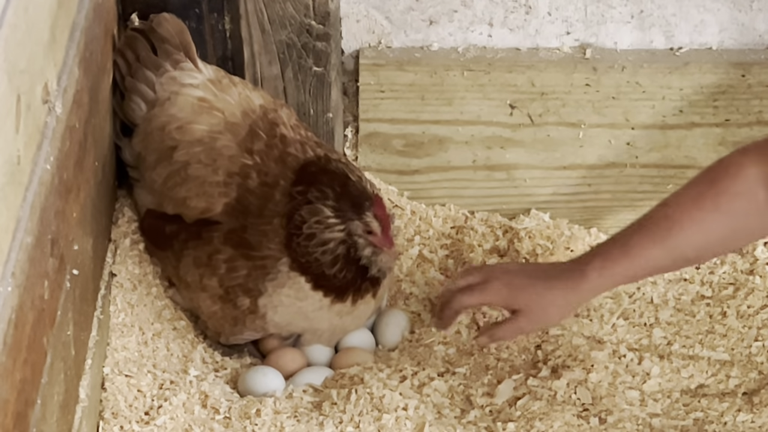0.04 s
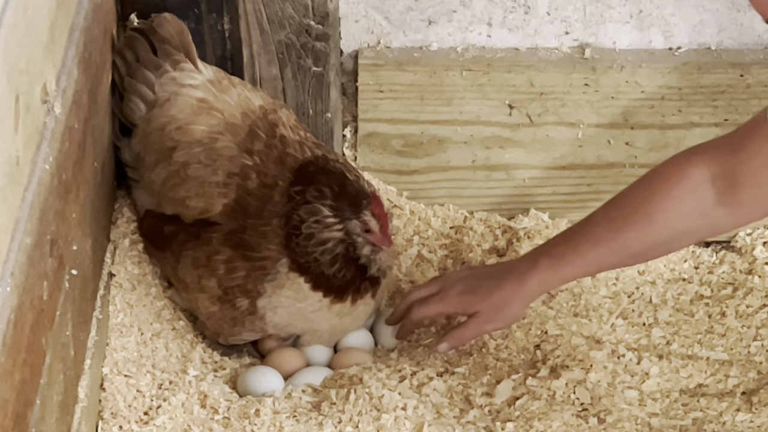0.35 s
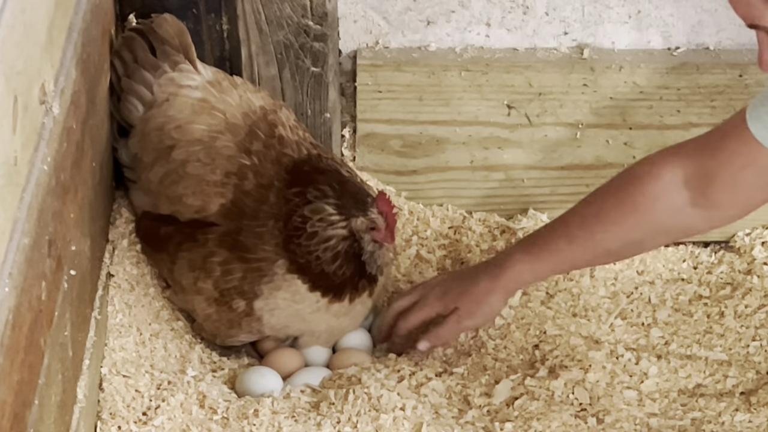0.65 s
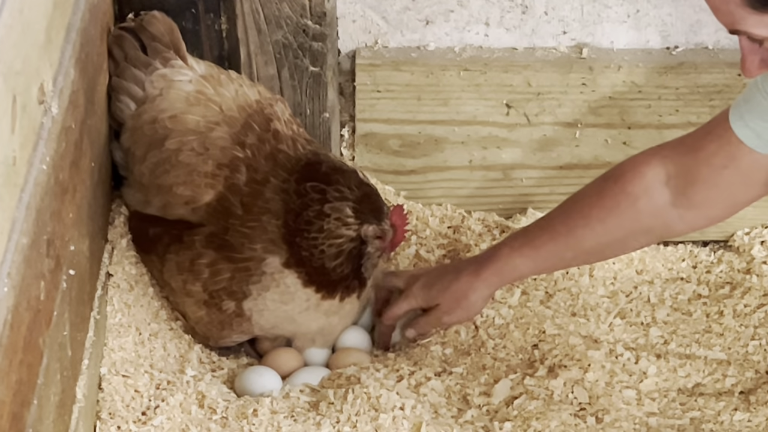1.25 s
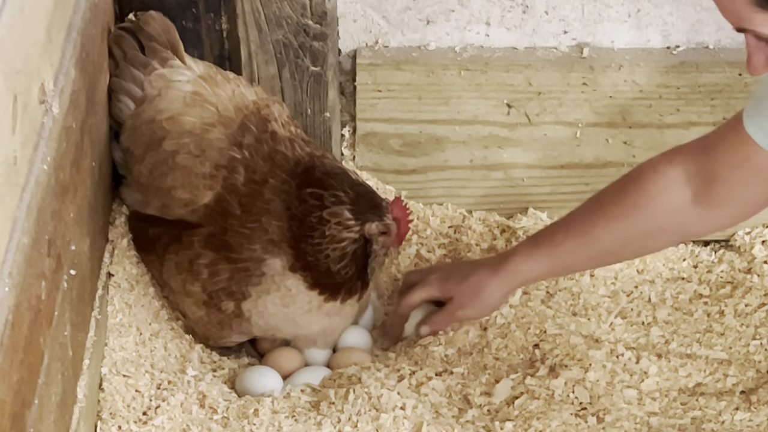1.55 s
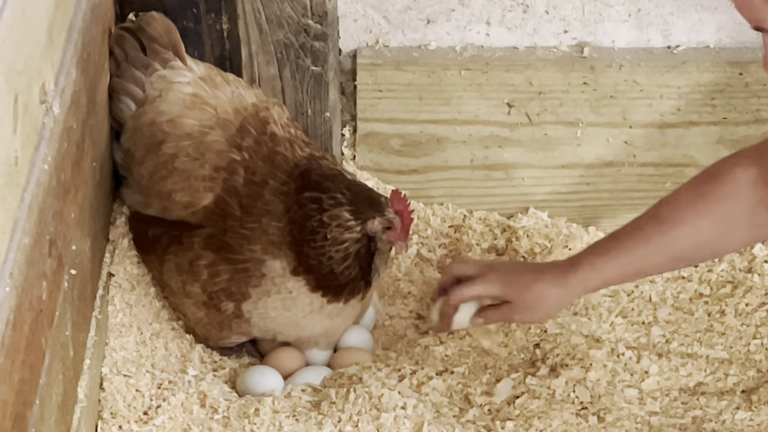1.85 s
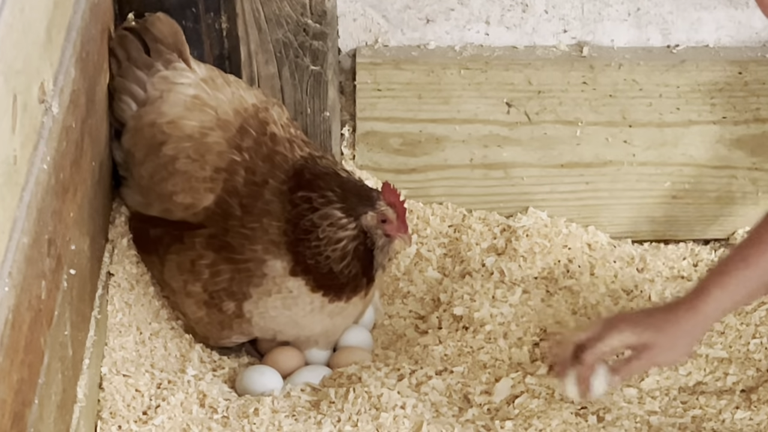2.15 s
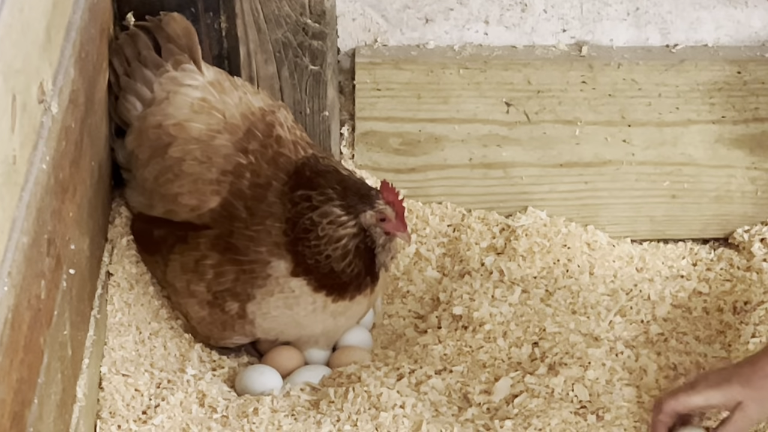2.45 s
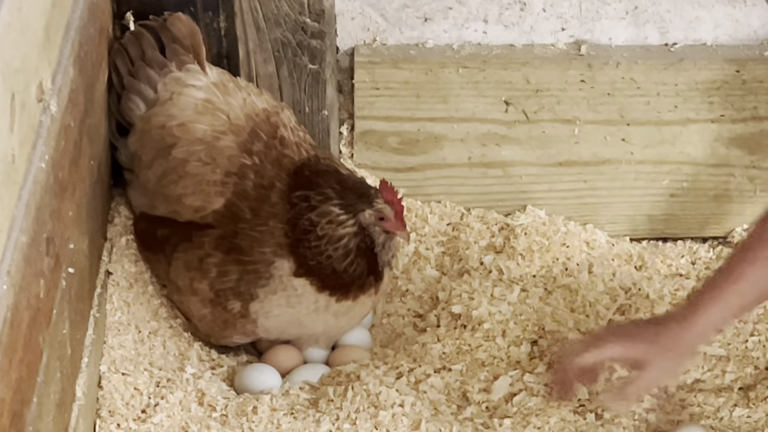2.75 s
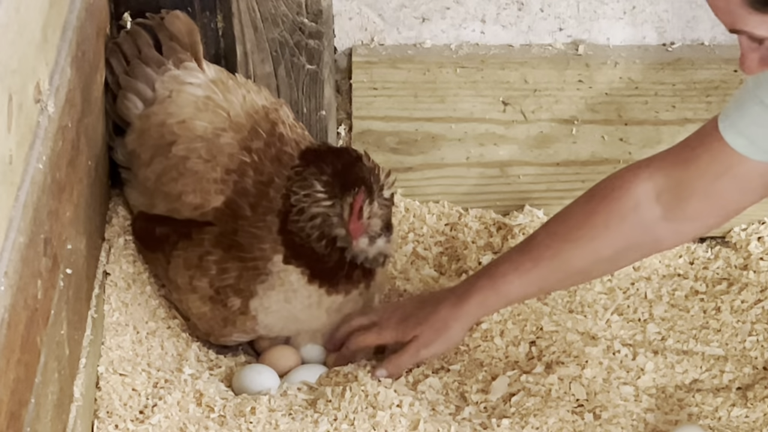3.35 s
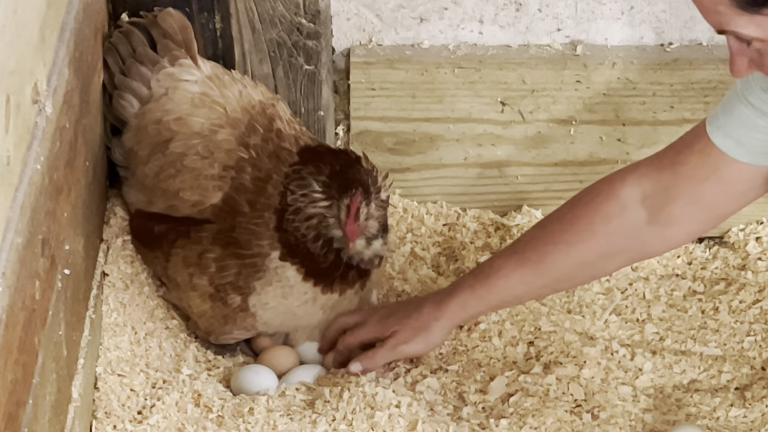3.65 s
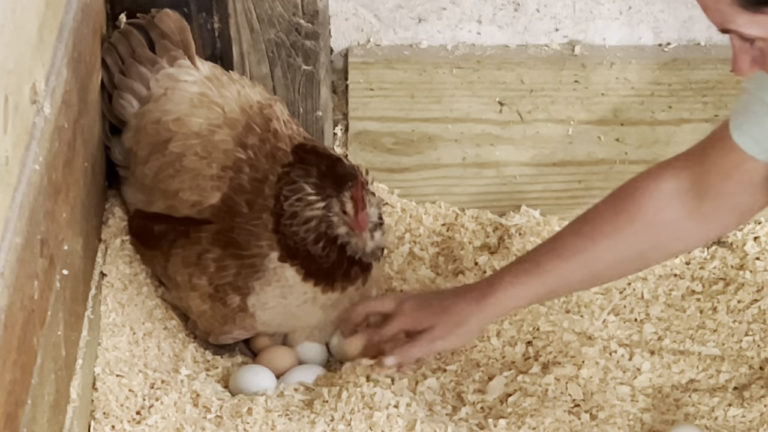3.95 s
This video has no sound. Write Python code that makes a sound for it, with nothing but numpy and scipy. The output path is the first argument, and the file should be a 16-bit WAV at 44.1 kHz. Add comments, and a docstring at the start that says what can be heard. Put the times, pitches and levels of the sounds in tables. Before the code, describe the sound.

A hen gives one drawn-out, raspy growl over a steady low fan hum.

```python
"""In a small wooden coop, a broody hen on her eggs growls once at a reaching hand.
One fluttering membrane makes her voice. It starts as a rasp of uneven slaps, then locks into a tone.
As the pitch sinks, strong and weak cycles alternate, adding half-pitch notes, and the rasp returns.
The boards give short echoes. A turning fan hums and pushes air throughout, a little to the left."""
import sys
import numpy as np
from scipy import signal
from scipy.fft import rfft, irfft, next_fast_len
from scipy.io import wavfile
from scipy.ndimage import uniform_filter1d

SR = 44100
rng = np.random.default_rng(int(sys.argv[2]) if len(sys.argv) > 2 else 0)


def to_wav(sig):
    """Store sig (one row per channel, or 1-D mono) as 16-bit WAV at the path in sys.argv[1].

    Samples outside -1..1 are clipped; the rate is SR.
    """
    pcm = np.clip(np.atleast_2d(sig), -1, 1) * 32767
    pcm = np.round(pcm).astype(np.int16)
    wavfile.write(sys.argv[1], SR, pcm.T)  # frames by channels


N = 176400
TIME = np.arange(N) / SR

# pitch of the growl: time_s, pitch_hz
GROWL_PITCH = [(1.3, 678), (1.38, 731.6), (1.45, 813), (1.52, 795), (1.57, 825.4), (1.66, 840.8),
               (1.76, 859.6), (1.86, 841), (1.97, 850.7), (2.05, 829), (2.13, 800), (2.2, 776), (2.28, 752)]
# loudness of its overtones: time_s, level_db
OVERTONE_LEVEL = [(1.44, -68), (1.51, -51), (1.59, -47.5), (1.76, -44), (1.87, -45.5), (2.01, -42),
                  (2.12, -49), (2.25, -50), (2.29, -57)]
# loudness of the rasp's low part: time_s, level_db
RASP_LEVEL = [(1.28, -71), (1.315, -38.5), (1.35, -45), (1.41, -36), (1.465, -33), (1.505, -42),
              (1.55, -71.5), (1.96, -71), (2.055, -42), (2.075, -23), (2.122, -33.5), (2.158, -26),
              (2.205, -43), (2.275, -37), (2.32, -65)]
# loudness of the rasp's treble: time_s, level_db
SIZZLE_LEVEL = [(1.3, -74.5), (1.47, -60), (1.6, -57.5), (1.92, -58), (2.04, -46), (2.11, -45.5),
                (2.16, -59), (2.26, -57), (2.32, -78.5)]


def from_db(db):
    """Turn decibels into a gain."""
    return 10 ** (np.asarray(db) / 20)


def unit_power(x):
    """Scale a signal to an average power of 1."""
    return x / np.sqrt(np.mean(x ** 2) + 1e-20)


def curve(rows):
    """Join (time_s, value) points with straight lines."""
    return np.interp(TIME, *np.transpose(rows))


def level(rows):
    """Gain from (time_s, level_db) points, silent outside them."""
    return from_db(np.interp(TIME, *np.transpose(rows), left=-140, right=-140))


def at_hz(rows, hz):
    """Look up hz in (frequency_hz, value) points, spaced by octaves."""
    frequencies, values = np.transpose(rows)
    return np.interp(np.log(hz), np.log(frequencies), values)


def drift(rate_hz):
    """A smooth random wobble, about 1 in size."""
    r = np.exp(-40 * np.pi * rate_hz / SR)
    slow = signal.lfilter([1], [1, -2 * r, r * r], rng.standard_normal(N // 20 + 4002))[4000:]
    return np.interp(np.arange(N) / 20, np.arange(len(slow)), unit_power(slow))


def filtered(x, kind, hz, order=2):
    """Keep the lows, the highs or a band."""
    return signal.sosfilt(signal.butter(order, hz, kind, fs=SR, output="sos"), x + 1e-18)


def resonate(x, rows):
    """Ring several resonances side by side, at a total power of 1."""
    out = 0
    for hz, width_hz, db in rows:
        r = np.exp(-np.pi * width_hz / SR)
        b = (1 - r * r) / 2 * np.array([1, 0, -1])
        a = [1, -2 * r * np.cos(2 * np.pi * hz / SR), r * r]
        out = out + from_db(db) * signal.lfilter(b, a, signal.lfilter(b, a, x))
    return unit_power(out)


def glide(x, hz, width_hz):
    """Ring one resonance whose centre moves."""
    r = np.exp(-np.pi * width_hz / SR)
    turn = np.exp(2j * np.pi * np.cumsum(hz) / SR)
    return (turn * signal.lfilter([(1 - r) ** 2], [1, -2 * r, r * r], x / turn)).real


def steady(x):
    """Hold the power near 1 over every few cycles."""
    x = unit_power(x)
    return x / np.sqrt(np.abs(uniform_filter1d(x ** 2, size=350)) + .05)


def per_side(x, factor):
    """Multiply the left spectrum by factor(hz) and divide the right by it."""
    size = next_fast_len(N + SR // 10, True)
    gain = factor(np.maximum(np.fft.rfftfreq(size, 1 / SR), 1))
    return irfft(rfft(x, size) * np.array([gain, 1 / gain]), size)[:, :N]


def fan_hum():
    """The fan hums at multiples of its turning rate, each wavering a little."""
    # hum at twice the turning rate: time_s, level_db
    lowest_hum = [(0, -45.5), (1.9, -52.5), (2.15, -44.5), (4, -47.5)]
    # hum at 3 to 12 times that rate: level_db
    upper_hum = [-63, -45, -63.5, -43.5, -44.5, -50.5, -72.5, -57.5, -56, -54]
    turns_per_s, out = 31.61, 0
    for k, db in enumerate([curve(lowest_hum), *upper_hum], 2):
        waver = 1 + .25 * drift(4.8)
        phase = 2 * np.pi * (k * turns_per_s * TIME + rng.random()) + .27 * drift(3.7)
        out = out + from_db(db) * unit_power(waver * np.sin(phase))
    return out


def fan_air():
    """Air rushes from the fan: noise in half-octave bands, widest in the low middle."""
    # shape of the rush: frequency_hz, relative_db
    rush = [(15, -52), (25, -9.5), (86, -8), (124, 2.5), (160, -10), (172, -1), (231, -5.5), (278, -12),
            (579, -12.5), (1000, -20.5), (6000, -47), (7800, -78), (13200, -120)]
    # its faint hiss: frequency_hz, relative_db
    hiss = [(3000, -60), (6500, -46.5), (9000, -48), (12000, -62.5), (15500, -56.5)]
    # how alike left and right are: frequency_hz, likeness (1 = the same)
    likeness = [(60, 0.97), (140, 1), (280, 0.8), (550, 0.38), (1100, 0.52), (1900, 0.98), (10000, 0.99),
                (13000, 0.81)]
    out, edges_hz = 0, 22 * 2 ** np.arange(0, 10, .5)
    noise = rng.standard_normal((2, 2, N))
    for k, (low, high) in enumerate(zip(edges_hz, edges_hz[1:])):
        mid, side = filtered(noise[k % 2], "band", [low, high], order=3)
        hz = np.sqrt(low * high)
        alike = at_hz(likeness, hz)
        width = np.sqrt((1 - alike) / (1 + alike))
        gain = from_db(max(at_hz(rush, hz), at_hz(hiss, hz)) + drift(6.4))
        out = out + gain * (mid + width * side * [[1], [-1]])
    return from_db(-36) * unit_power(out)


def coop(x):
    """Near boards echo the sound; a short tail follows and dies sooner in the treble."""
    # echoes off the boards: delay_s, gain_db
    boards = [(.0031, -42), (.0074, -5.5), (0.0132, -16)]
    bright = filtered(x, "band", [2400, 8000])
    echoes = sum(from_db(db) * np.interp(TIME - delay_s, TIME, bright) for delay_s, db in boards)
    low_fade_s, high_fade_s = .33, .17  # time to fall by 60 dB
    t = TIME[:SR // 2]
    noise = rng.standard_normal((2, len(t))) * (t > .006)
    lows = filtered(noise, "low", 2000) * from_db(-60 * t / low_fade_s)
    highs = filtered(noise, "high", 2000) * from_db(-60 * t / high_fade_s)
    tail = filtered(lows - highs, "low", 7900, order=1)
    tail /= np.sqrt(np.sum(tail ** 2, axis=1, keepdims=True))
    mid, side = signal.fftconvolve(x[None], tail, axes=1)[:, :N]
    side = 2.5 * filtered(side, "low", 490, order=1)  # wide only in the lows
    return x + echoes + from_db(-11) * (mid + side * [[1], [-1]]) / 2


def rasp(pitch):
    """Uneven slaps of the membrane ring in the throat and beak; air adds a hoarse hiss."""
    # low resonance, sliding down at each break of the voice: time_s, centre_hz
    slide = [(1.3, 885), (1.45, 940), (1.48, 780), (2.065, 988), (2.11, 836), (2.145, 900), (2.18, 862)]
    # that resonance and one at 1.5 times the pitch: width_hz, relative_db
    body_resonances = [(130, 3.5), (220, 0.5)]
    # treble resonances: centre_hz, width_hz, relative_db
    treble_resonances = [(1566, 200, 10.5), (2480, 340, 4.5), (4490, 290, -2.5), (6800, 280, -1),
                         (8340, 370, 1.5), (9300, 500, -18)]
    # narrow ring of the throat: time_s, centre_hz, level_db
    throat_ring = [(1.36, 4110, -74), (1.48, 3976, -55.5), (1.6, 3960, -78), (1.949, 3970, -72),
                   (2.035, 3960, -52.5), (2.12, 3920, -54), (2.29, 3780, -54), (2.305, 3820, -74)]
    cycles = np.floor(np.cumsum(pitch * (1 + .22 * drift(400))) / SR)
    slaps = np.diff(cycles, prepend=0) * rng.normal(.79, 1, N)  # one slap per uneven cycle
    body = sum(from_db(db) * glide(slaps, hz, width_hz)
               for hz, (width_hz, db) in zip([curve(slide), 1.5 * pitch], body_resonances))
    ring = glide(slaps, curve([(s, hz) for s, hz, db in throat_ring]), width_hz=110)
    ring_gain = level([(s, db) for s, hz, db in throat_ring])
    hiss_hz = [10800, 15500]
    hiss = filtered(filtered(rng.standard_normal(N), "band", hiss_hz), "band", hiss_hz)
    sizzle = resonate(slaps, treble_resonances) + from_db(-11) * unit_power(hiss)
    return level(RASP_LEVEL) * steady(body) + ring_gain * steady(ring) + level(SIZZLE_LEVEL) * sizzle


def throat_notes(phase, pitch, flutter, multiples, throat_gains):
    """Multiples of the pitch, shaped by throat and beak, each swelling at its own point of the flutter."""
    # resonance that moves as the beak opens: time_s, centre_hz
    beak = [(1.65, 4040), (1.8, 3830), (1.97, 3540), (2.1, 3770), (2.25, 3940)]
    beak_boost_db, beak_width_hz = 9.5, 350
    growling = (TIME > GROWL_PITCH[0][0]) & (TIME < RASP_LEVEL[-1][0])
    strength, beak_hz = level(OVERTONE_LEVEL)[growling], curve(beak)[growling]
    dull_db_per_octave = 2 * (1 - strength / strength.max())  # a weak voice loses its top
    out = np.zeros(N)
    for k in multiples:
        hz = k * pitch[growling]
        boost_db = beak_boost_db * np.exp(-((hz - beak_hz) / beak_width_hz) ** 2)
        dull_db = dull_db_per_octave * np.log2(np.maximum(hz / beak_hz, 1))
        shimmer_db = 2.5 * drift(82)[growling]
        gain = from_db(at_hz(throat_gains, hz) + boost_db - dull_db + shimmer_db)
        depth = .6 if k >= 2 else .2
        lead_radians = 1 + drift(3.6)  # mostly swells ahead of the tone
        swell = 1 + depth * np.sin(flutter + lead_radians)[growling]
        out[growling] += gain * swell * np.sin(k * phase[growling] + rng.uniform(0, 2 * np.pi))
    out[growling] = unit_power(out[growling])
    return out


def hen():
    """One fluttering membrane makes a clear tone, overtones, half-pitch notes and a rasp."""
    # loudness of the clear tone: time_s, level_db
    tone_level = [(1.43, -64), (1.47, -40.5), (1.52, -31.5), (1.572, -29), (1.61, -34.5), (1.65, -40.5),
                  (1.665, -29.5), (1.72, -31), (1.765, -25.5), (1.8, -31), (1.97, -27.5), (2.05, -31.5),
                  (2.075, -39), (2.115, -28.5), (2.14, -39), (2.195, -40.5), (2.22, -33.5), (2.255, -34),
                  (2.275, -60)]
    # loudness of the half-pitch notes, when strong and weak cycles alternate: time_s, level_db
    half_level = [(1.3, -61.5), (1.35, -51), (1.45, -41), (1.51, -43.5), (1.54, -83), (1.9, -87),
                  (1.94, -40), (2.01, -35), (2.07, -33.5), (2.18, -31), (2.25, -41), (2.29, -54)]
    # how the throat shapes the overtones: frequency_hz, relative_db
    overtone_gains = [(1650, 3), (2550, 1.5), (3400, -8.5), (4200, -4), (5000, -12), (5950, -9), (7700, -9),
                      (8500, -13), (9400, -3.5), (11200, -15.5)]
    # how it shapes the half-pitch notes: frequency_hz, relative_db
    half_gains = [(400, -26), (1100, 10), (1300, -8.5), (2000, -40), (3500, -22.5), (3850, -19.5),
                  (4400, -51), (7000, -49), (9000, -24), (13000, -59.5)]
    flutter_hz, flutter_depth, flutter_bend = 54, .47, .017  # depth: share of level; bend: of pitch
    flutter = 2 * np.pi * np.cumsum(flutter_hz * (1 + .0302 * drift(7.16))) / SR
    beat = np.sin(flutter)
    pitch, tone_gain, half_gain = curve(GROWL_PITCH), level(tone_level), level(half_level)
    rasp_gain = level(RASP_LEVEL) + level(SIZZLE_LEVEL)
    roughness = rasp_gain / (rasp_gain + tone_gain + half_gain)
    jitter = (.0047 + .03855 * roughness) * drift(140)  # more rasp, shakier pitch
    phase = 2 * np.pi * np.cumsum(pitch * (1 + flutter_bend * beat + jitter)) / SR
    swell = 1 + flutter_depth * (1 + .1 * drift(5.8)) * beat
    swell *= 1 + .2 * drift(34)  # uneven from beat to beat
    tone = tone_gain * np.sqrt(2) * np.sin(phase - .11 * np.cos(flutter)) * unit_power(swell)
    overtones = throat_notes(phase, pitch, flutter, np.arange(2, 12), overtone_gains)
    halves = throat_notes(phase, pitch, flutter, np.arange(13) + .5, half_gains)
    fluttering_rasp = rasp(pitch) * unit_power(1 + .3 * beat)
    return tone + level(OVERTONE_LEVEL) * overtones + half_gain * halves + fluttering_rasp


def scene():
    """The hen in the coop, the fan a little to the left."""
    # the fan's lean, up on the left and down on the right: frequency_hz, gain_db
    fan_lean = [(180, .5), (280, 2.1), (380, 1), (550, -.1), (2000, 0)]
    growl = coop(hen())
    fan = per_side(fan_hum() + fan_air(), lambda hz: from_db(at_hz(fan_lean, hz)))
    return growl + fan


def record(dry):
    """The microphone's two openings put the treble out of step; the very top is cut steeply."""
    # how far the left opening is ahead of the right: frequency_hz, lead_radians
    left_lead = [(60, -.08), (130, -.13), (400, -.3), (1000, 0), (1800, -.1), (3700, .6), (5000, .3),
                 (6000, -.4), (6900, 0), (7600, -.4), (8400, -1), (9000, -2.5), (10800, -3.2),
                 (14000, -6.7)]
    shifted = per_side(dry, lambda hz: np.exp(.5j * at_hz(left_lead, hz)))
    cutoff_hz = 15650
    return signal.sosfilt(signal.ellip(12, .2, 80, cutoff_hz, fs=SR, output="sos"), shifted)


dry = scene()
out = record(dry)
to_wav(out)
```